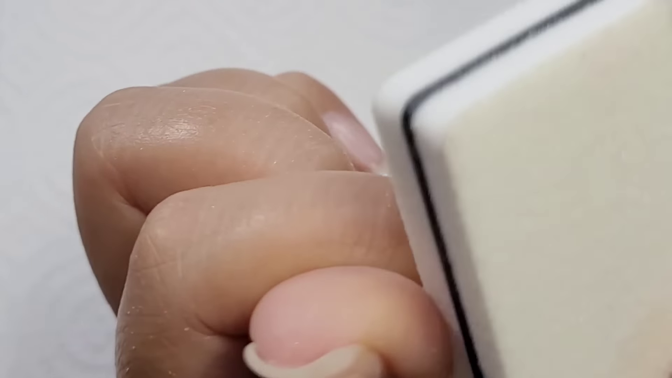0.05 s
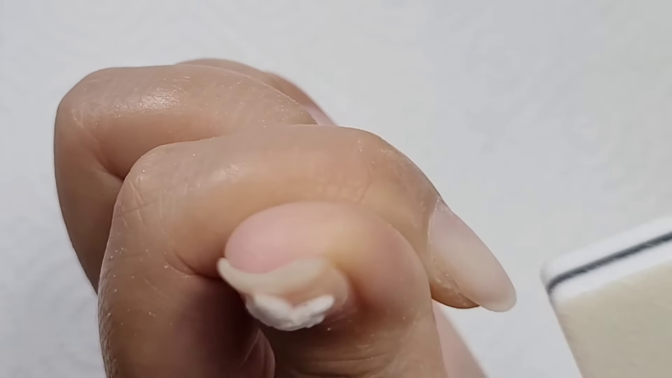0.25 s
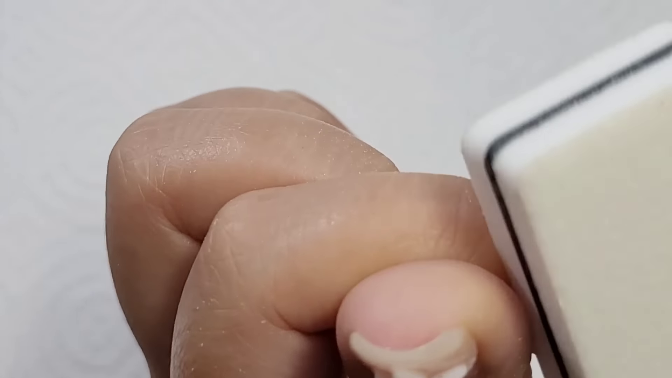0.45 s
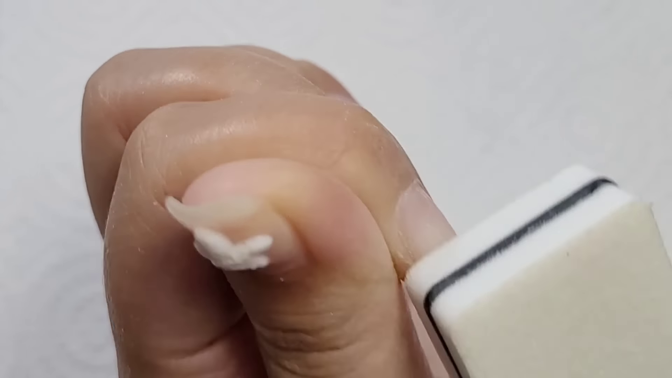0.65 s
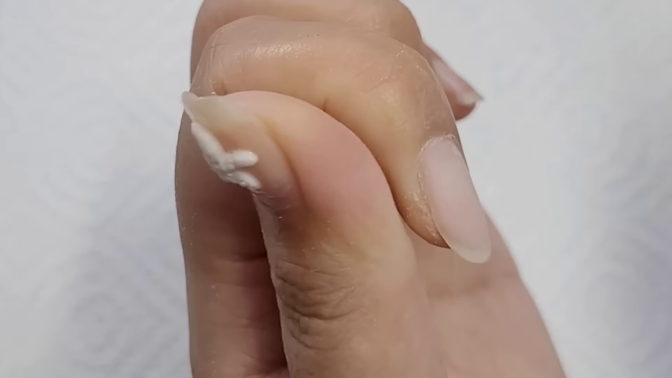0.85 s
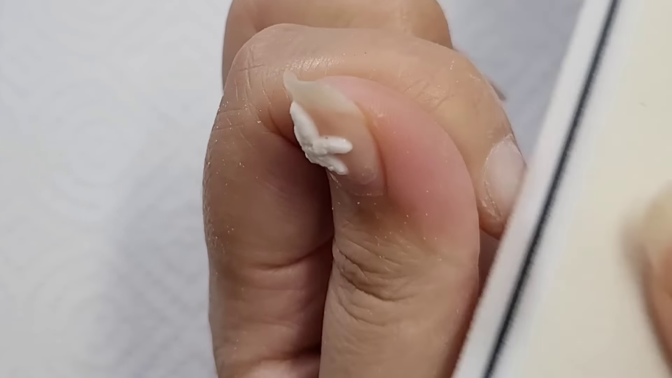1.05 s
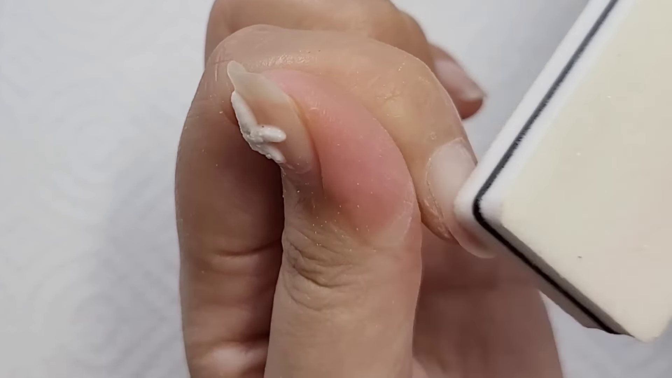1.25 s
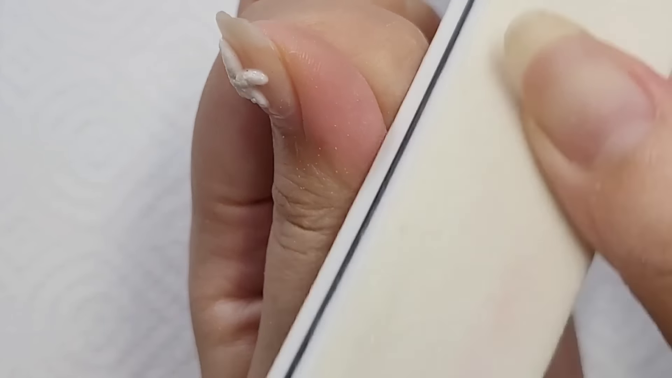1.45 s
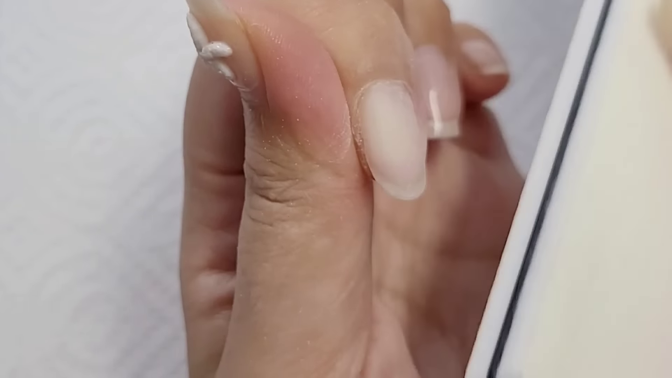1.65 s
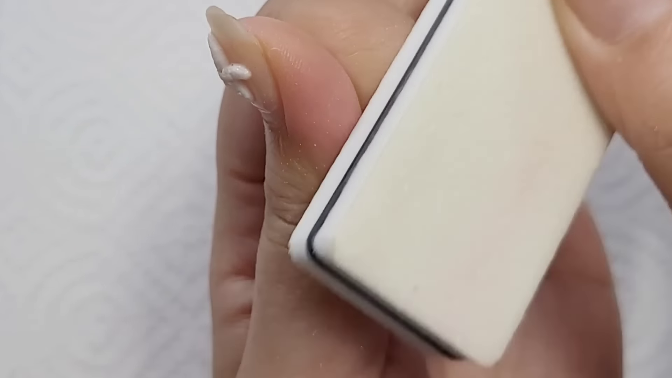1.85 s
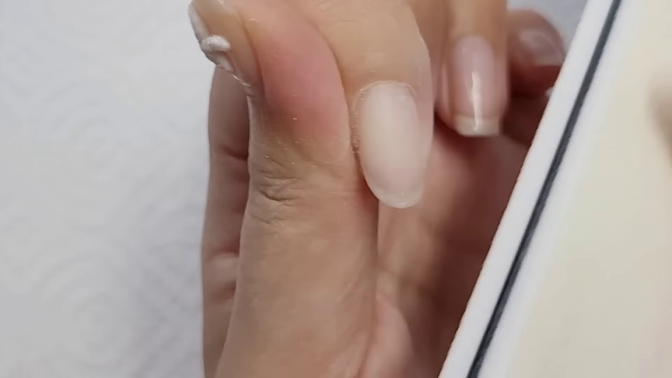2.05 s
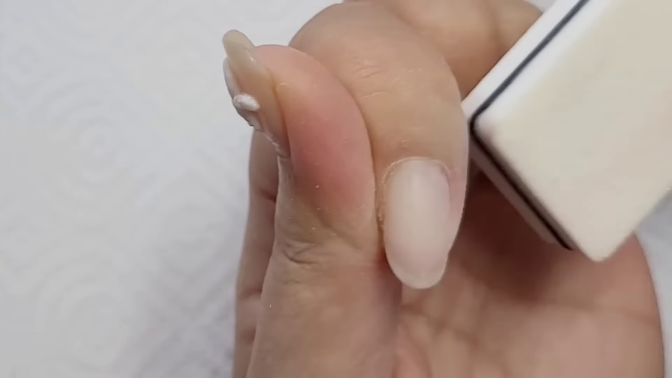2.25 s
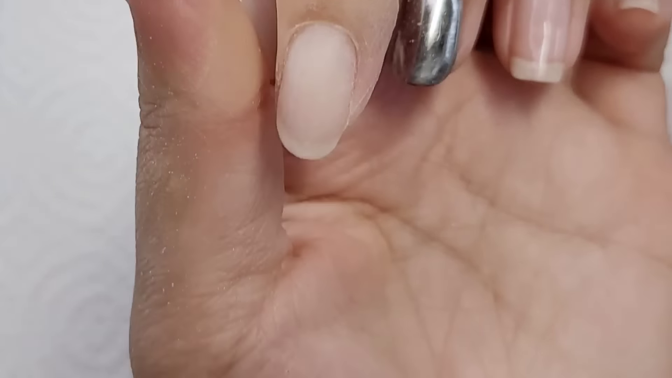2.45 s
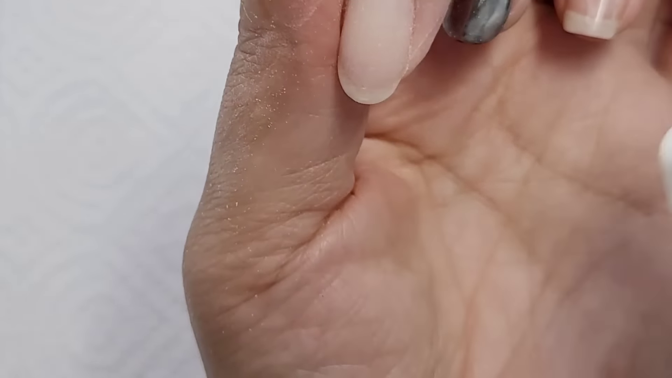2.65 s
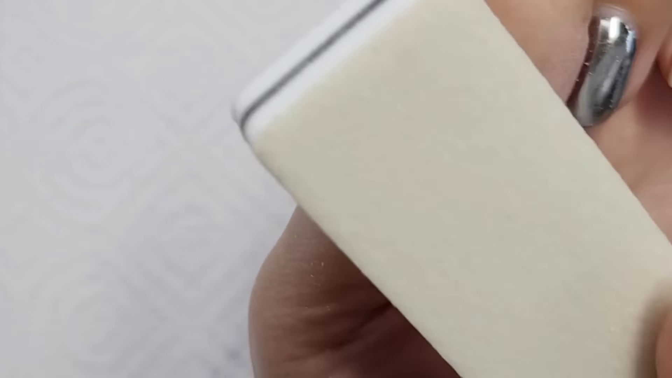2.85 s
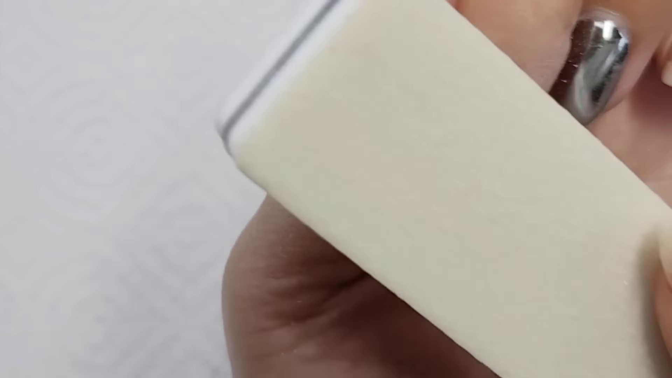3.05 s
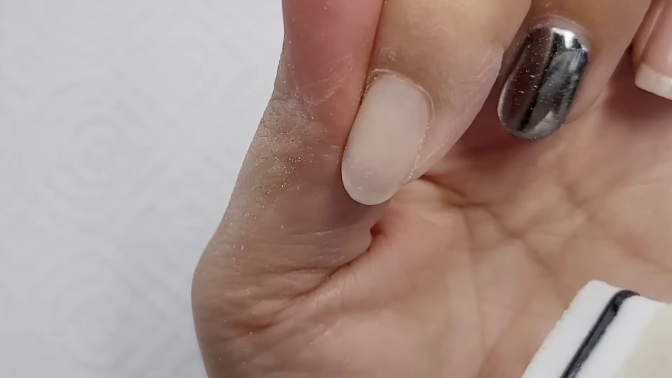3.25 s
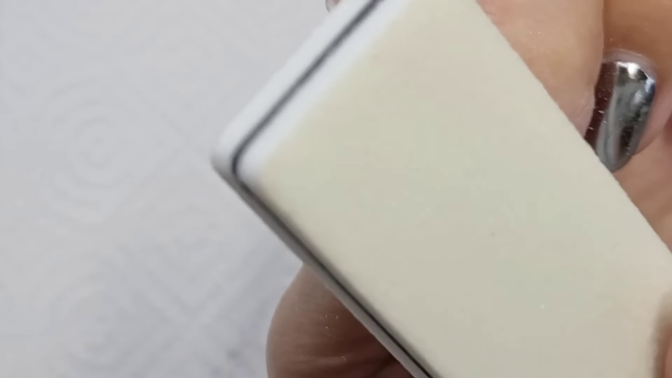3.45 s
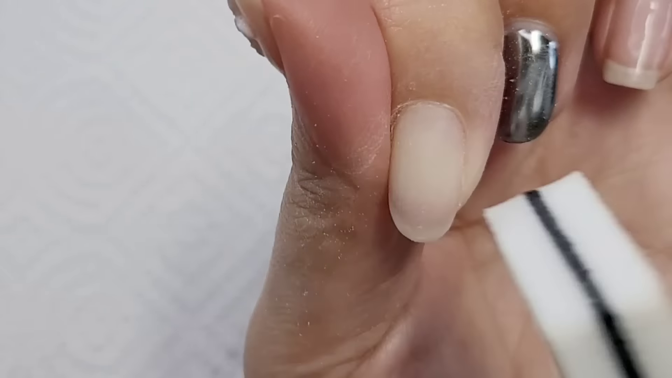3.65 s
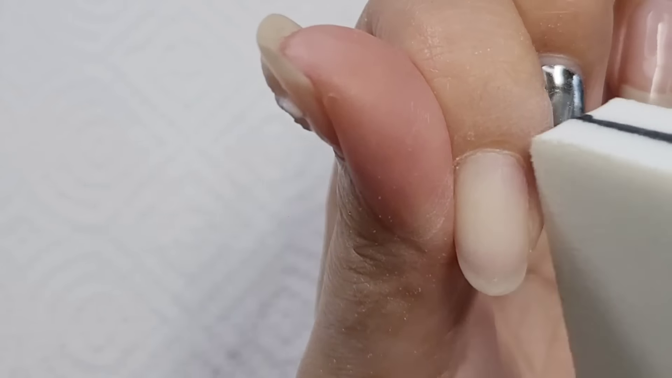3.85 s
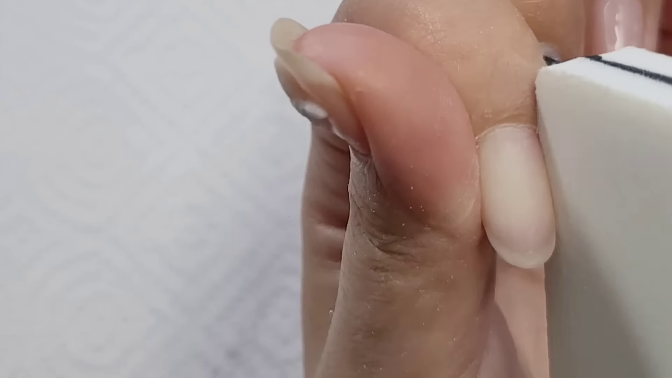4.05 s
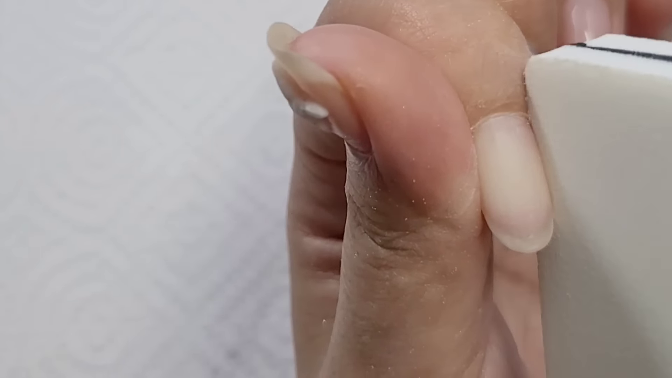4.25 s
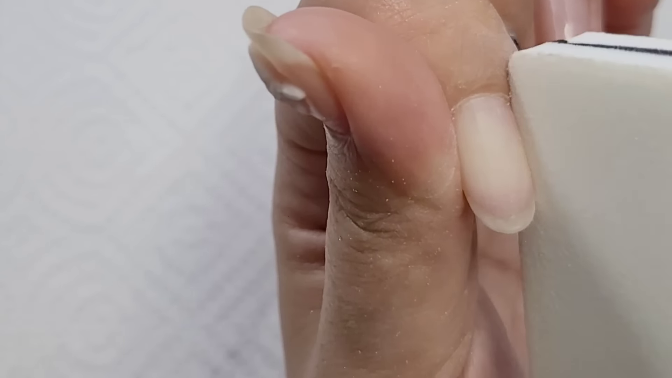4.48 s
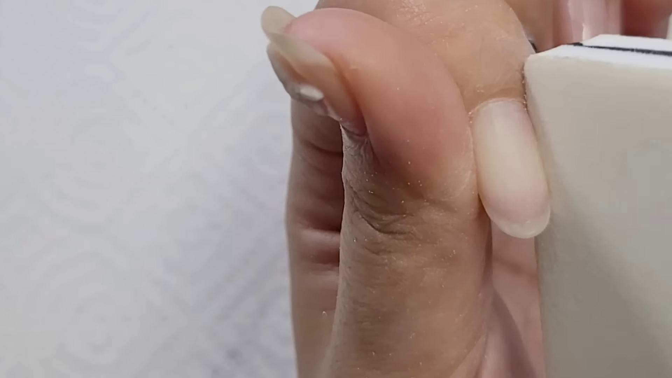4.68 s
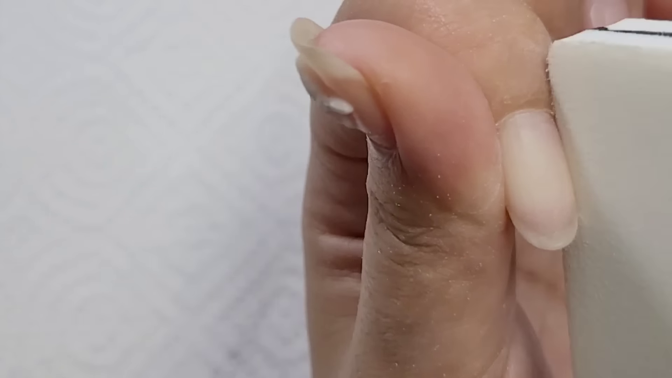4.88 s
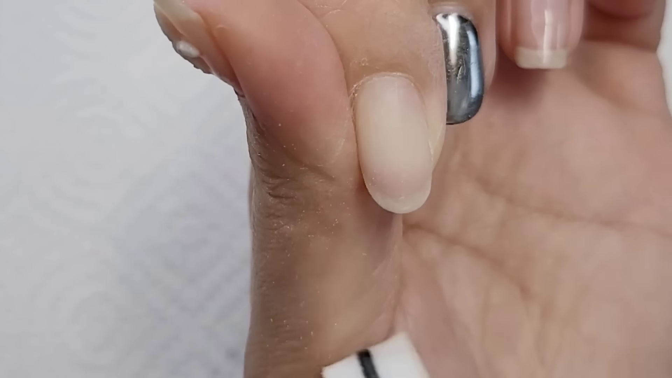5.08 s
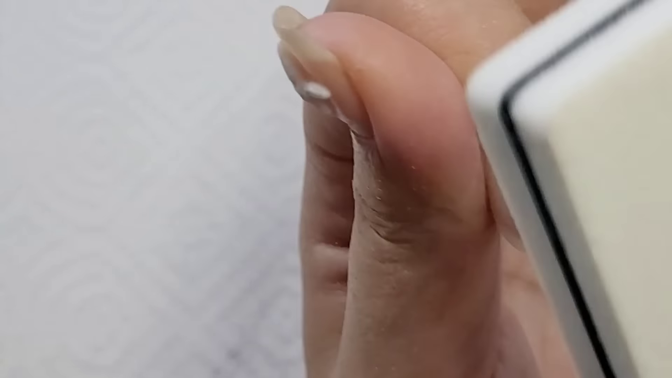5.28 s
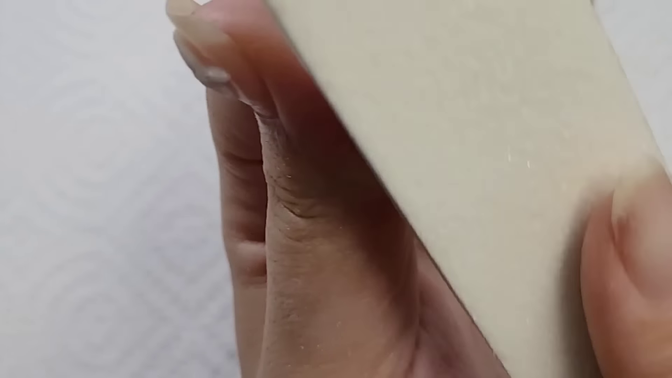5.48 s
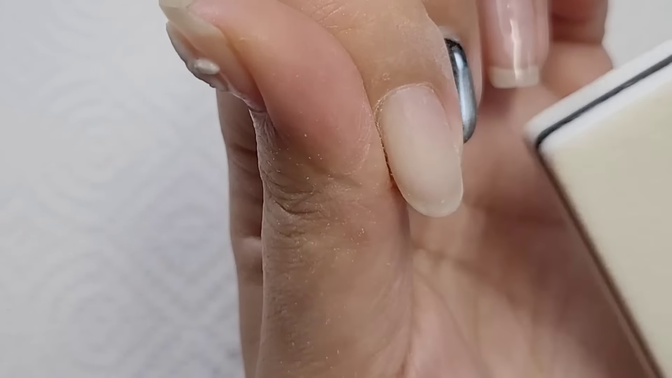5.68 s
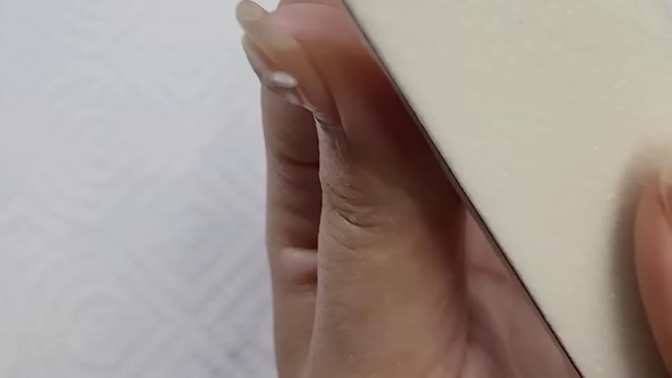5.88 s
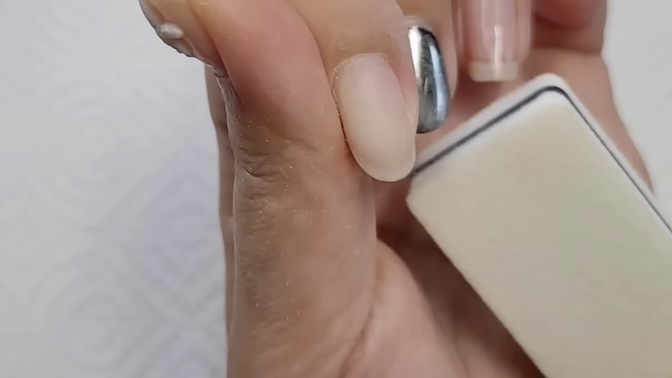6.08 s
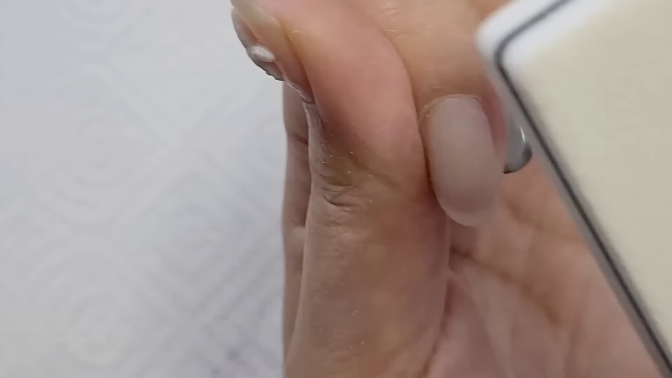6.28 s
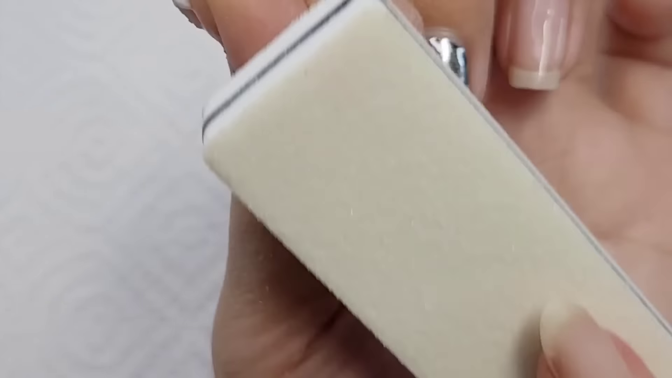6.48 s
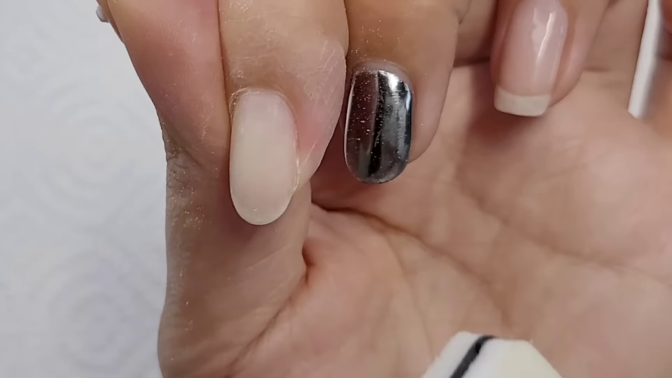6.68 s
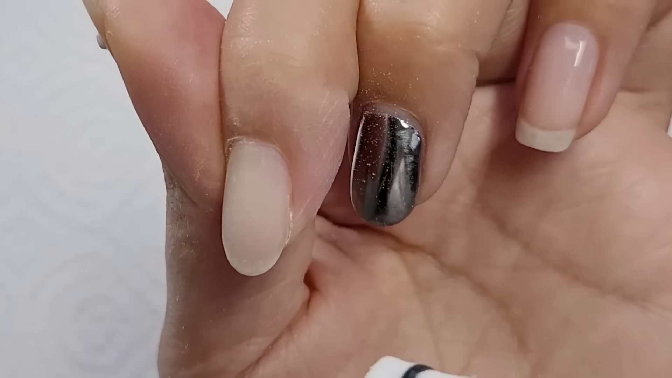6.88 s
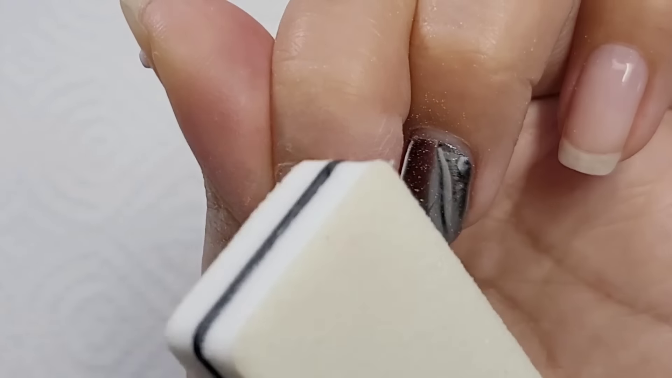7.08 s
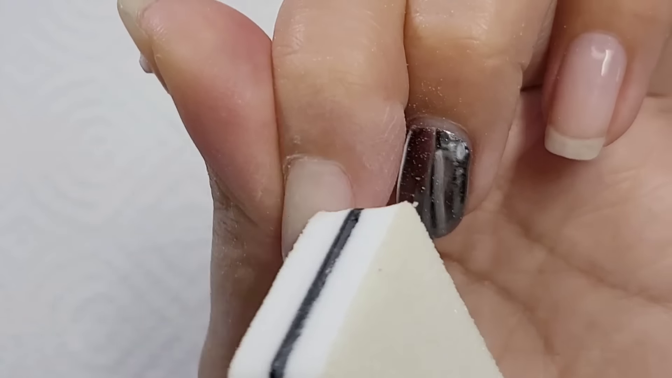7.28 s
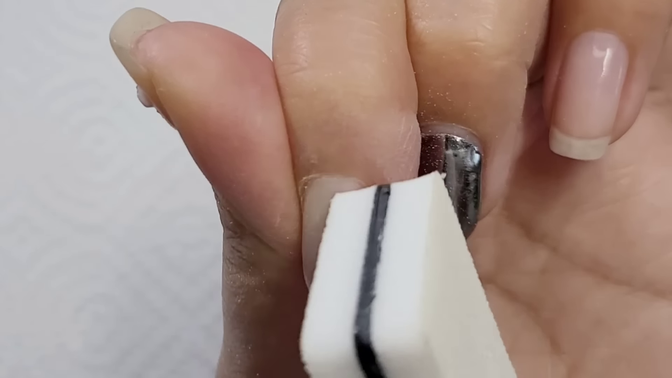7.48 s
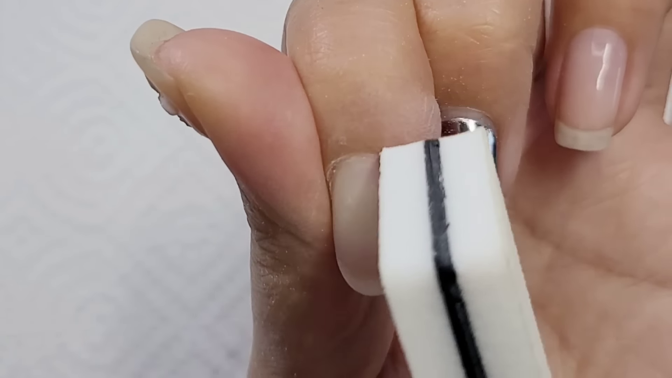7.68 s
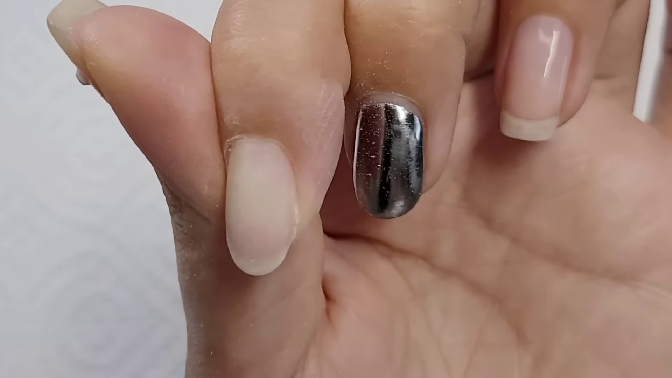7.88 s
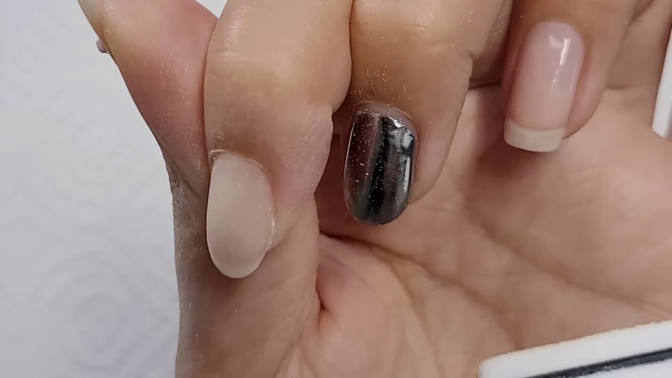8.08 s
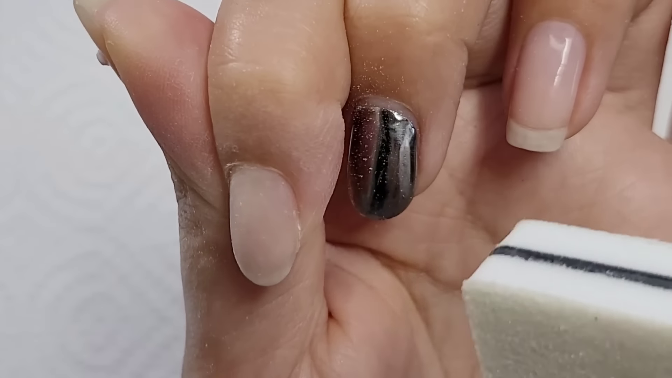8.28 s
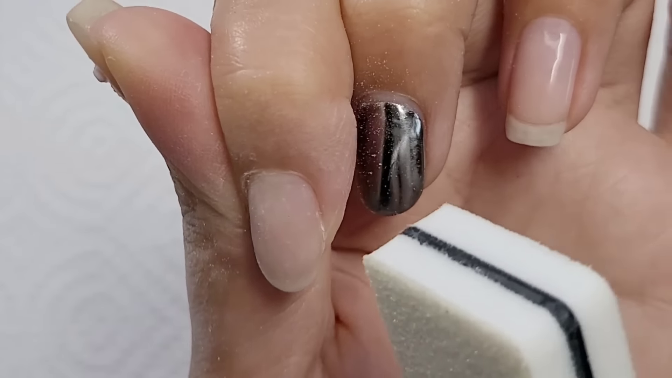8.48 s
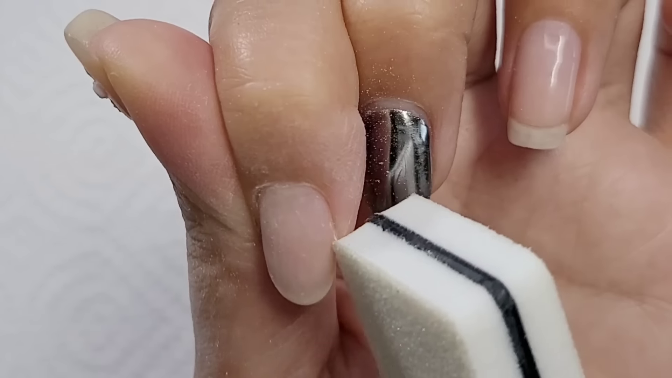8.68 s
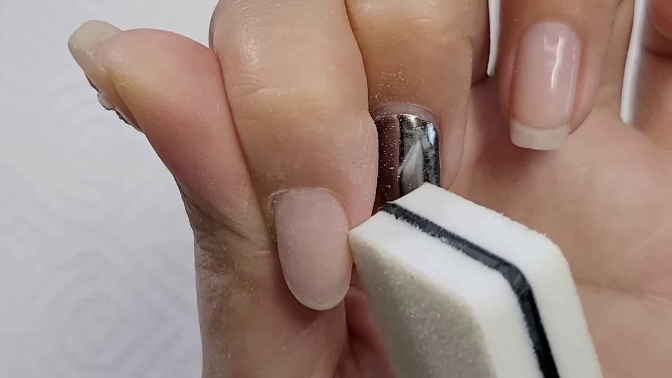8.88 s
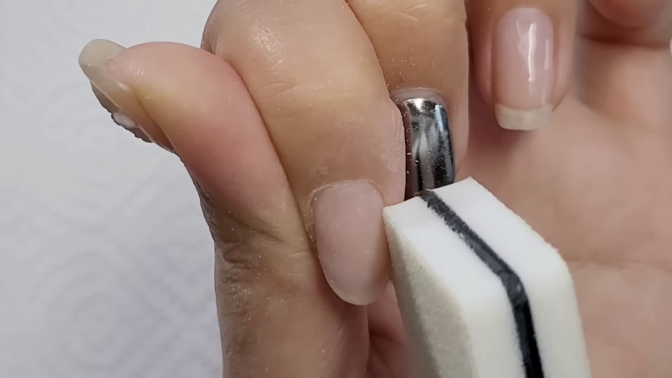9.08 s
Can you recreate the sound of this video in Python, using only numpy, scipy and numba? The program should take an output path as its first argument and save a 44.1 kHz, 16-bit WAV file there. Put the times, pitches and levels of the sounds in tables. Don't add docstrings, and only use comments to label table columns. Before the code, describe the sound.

Very close stereo pickup of a nail being buffed with a foam block in a small, quiet furnished room. Separate hissy, gritty pulls, some ending in a sharp knock as the edge snaps off the tip, give way to quick, quieter side flicks. Long pulls return, then short flicks and light drags, ending in near silence over faint ventilation.

```python
import sys
import numpy as np
from scipy import signal
from scipy.fft import rfft, irfft, next_fast_len
from scipy.io import wavfile
from scipy.ndimage import uniform_filter1d
from numba import njit

SR = 44100
rng = np.random.default_rng(int(sys.argv[2]) if len(sys.argv) > 2 else 0)


def wav_out(sig):
    wavfile.write(sys.argv[1], SR, np.round(np.clip(np.atleast_2d(sig).T, -1, 1) * 32767).astype(np.int16))


def ratio_of_db(decibels):
    return 10 ** (np.asarray(decibels, float) / 20)


N = 402633
M = next_fast_len(N)
HZ = np.fft.rfftfreq(M, 1 / SR) + 1
T = np.arange(N) / SR

# [t/s, finger cupping 0-1, free edge ring/dB, face turned to microphone/dB, left minus right/dB]
HOLD = [(.05, 0.77, 1, -5.5, 0), (.28, 0, 2, .3, -.5), (.579, 0.83, -5.5, 2.5, 0.5),
        (.781, 0, -0.3, 1, 0.8), (1.02, 0.72, 2.5, 4.5, -1.1), (1.33, 0.16, 13.5, .6, 1.1),
        (2.2, 0.2, 5, -1, 2), (2.72, 0.7, 6, -2.5, -0.5), (3.03, 0.76, -2.5, 3, 2.5),
        (3.65, 0.54, -3, -2, 1.6), (4.3, 0.96, 13, -2, 1), (4.95, 0.9, 13.5, 1, .6),
        (5.14, 0.71, -4.5, -0.8, 1.2), (5.7, 0.37, 5.5, -1.2, 1.5), (6.65, 0.65, 3, -2, 0.8),
        (7.22, 0.81, -20, -0.5, 3), (7.88, 0.88, -12.5, 1.5, 2), (8.3, 0.3, -22.5, -3.5, 0.7)]
# [f/Hz, density/dB per Hz]
GRIT_COLOUR = [(530, -30), (900, -29.5), (1320, -28.5), (1850, -20), (2070, -25), (2660, -10.5), (4680, -7),
               (8660, -2.5), (10500, -8.5), (13200, -5.5), (16000, -9)]
# [f/Hz, width/Hz, level/dB]
FREE_EDGE = [(7800, 170, -0.5), (8620, 790, -2)]

# [contact t/s, lift t/s, level at contact/dB, level at lift/dB, nail plate share/dB]
SWEEPS = [(.533, .624, -46.5, -48, -7), (.985, 1.01, -54, -50, -12.5), (1.236, 1.404, -49.5, -48.5, -12),
          (1.536, 1.714, -54, -47, -13.5), (1.91, 2.088, -54, -43, -12.5), (2.278, 2.395, -51, -42.5, -9.5),
          (2.966, 3.078, -47.5, -45.5, -9), (3.512, 3.578, -48.5, -48, -12),
          (3.675, 3.785, -46, -47.5, -13.5), (5.578, 5.778, -49, -44, -9),
          (6.563, 6.71, -47.5, -40.5, -10.5)]
SNAPS = [
    (.165, .338, -50, -39.5, -9.5),
    (.692, .824, -49.5, -39, -11),
    (2.696, 2.762, -54.5, -45.5, -9),
    (3.16, 3.281, -44, -44, -9),
    (5.1, 5.164, -49, -43.5, -8),
    (6.071, 6.226, -49, -39, -9),
    (7.845, 7.902, -56, -37.5, -9),
]
FLICKS = [(4.252, 4.288, -62.5, -56, -2), (4.368, 4.4, -57.5, -61.5, -4.5), (4.48, 4.504, -54, -56, -5.5),
          (4.576, 4.596, -58.5, -56, -6), (4.682, 4.706, -57, -58.5, -5), (4.78, 4.796, -58.5, -53.5, -5),
          (4.875, 4.912, -56.5, -50.5, -7), (4.98, 5.033, -53.5, -58, -5.5),
          (7.177, 7.255, -58, -49.5, -9.5), (7.373, 7.422, -52, -46.5, -8.5),
          (7.491, 7.526, -48, -48, -7.5), (7.616, 7.658, -53.5, -54, -6.5), (7.741, 7.752, -53.5, -55, -11),
          (1.285, 1.33, -48.5, -52, -10), (3.185, 3.215, -45, -46.5, -10), (6.2, 6.22, -40.5, -39.5, -19.5),
          (6.68, 6.704, -41, -40.5, -21)]
DRAGS = [(0.002, .085, -69.5, -57.5, -2.5), (.86, .93, -68, -63, -3.5), (1.015, 1.085, -48, -59.5, -8),
         (1.105, 1.19, -61, -60, -8), (2.425, 2.476, -50, -56.5, -8), (2.501, 2.566, -50, -60.5, -15.5),
         (2.594, 2.666, -54.5, -61.5, -10.5), (2.836, 2.87, -56.5, -68, -9), (2.93, 2.955, -64, -60, -3.5),
         (3.445, 3.482, -70, -56, -4.5), (4.032, 4.11, -63, -73, -9.5), (5.176, 5.235, -60, -59.5, -7),
         (5.524, 5.555, -57, -88, 6), (6.033, 6.06, -68, -63, -4), (6.244, 6.31, -41.5, -60, -10),
         (6.497, 6.535, -51, -70, -3), (6.725, 6.82, -42.5, -70, -7.5), (7.916, 7.98, -56, -53.5, -13.5),
         (8.014, 8.08, -54, -64.5, -7.5), (8.108, 8.15, -52.5, -52, -9), (8.165, 8.27, -55, -61.5, -7),
         (8.28, 8.337, -60.5, -55.5, -15), (8.403, 8.46, -51, -56.5, -17.5), (8.578, 8.648, -71, -72, -7)]
# [t/s, level/dB, nail plate share/dB]
CATCHES = [(.103, -45.5, -11), (.951, -50, -7.5), (1.146, -59, -12), (1.212, -42, -20), (1.52, -45.5, -18),
           (2.263, -43, -15.5), (2.673, -58.5, -10), (3.31, -41.5, -13.5), (3.498, -42, -23),
           (5.163, -41.5, -9), (5.255, -49, -18), (7.9, -38.5, -6.5), (7.997, -41.5, -12), (.973, -58, -10),
           (5.285, -60, -3), (8.048, -57.5, -7), (8.454, -55.5, -11), (8.52, -65.5, -15),
           (4.178, -65.5, -5)]
# [t/s, hush just before/dB]
LANDINGS = [(.099, -3.5), (.533, -21), (1.207, -2.5), (1.517, -17.5), (1.904, -5), (2.261, -4), (2.962, -7),
            (3.495, -8.5), (4.977, -7.5), (5.523, -13.5), (6.031, -14), (6.068, -6), (6.492, -14),
            (7.175, -14), (7.488, -12)]

# [t/s, click level/dB, click f/Hz, thud level/dB, crack level/dB]
KNOCKS = [(0.333, -40, 1040, -52.5, -36), (0.553, -51.5, 398, -69, -46), (0.823, -37.5, 1040, -51, -30.5),
          (2.258, -53.5, 417, -59, -49), (2.419, -30.5, 424, -53, -44), (2.431, -55, 398, -58, -44),
          (2.437, -43, 406, -68, -50), (2.961, -56.5, 397, -59.5, -45.5), (5.162, -44, 1900, -53.5, -27),
          (5.524, -53.5, 436, -60, -49), (5.777, -40.5, 980, -63, -35), (6.035, -52, 482, -51, -58),
          (6.221, -37, 970, -67.5, -31), (6.49, -60, 533, -62, -47), (6.706, -37, 950, -55, -26),
          (6.711, -40, 730, -70.5, -55), (7.9, -42.5, 1910, -52.5, -32.5), (7.992, -57, 1230, -68, -41)]
# [t/s, level/dB]
LOOSE_GRIT = [
    (0.1042, -49),
    (1.2095, -35),
    (1.5192, -42.5),
    (3.4973, -52),
    (4.0317, -57),
    (4.62, -69.5),
    (8.504, -54),
    (8.5764, -50),
    (8.628, -67),
]
# [start t/s, end t/s, f/Hz, width/Hz, level/dB]
BRUSHES = [
    (8.533, 8.686, 5500, 1310, -69),
    (9.078, 9.14, 7960, 3520, -79),
]

# [f/Hz, density/dB per Hz]
AIR_COLOUR = [(15, -33), (30, -0.5), (48, -4.5), (100, -3.5), (200, -10), (400, -9), (700, -11), (900, -16),
              (1100, -23), (2500, -26), (4500, -31.5), (7000, -35.5), (9000, -31), (16000, -38)]
# [f/Hz, likeness -1 to 1]
AIR_ALIKE = [(60, 0.96), (130, 0.72), (290, 0.51), (640, -0.36), (1400, -0.24), (3100, -0.14),
             (15000, -0.17)]
# [f/Hz, level/dB]
WHINE = [(4927, -108), (9853, -101), (14780, -105)]

# (attack dB/s, release dB/s, swell dB, dust onset dB)
SWEEP, SNAP = (1002, 446.5, 2, -25.5), (1001, 851.5, 1.5, -20)
FLICK, DRAG, CATCH = (813, 700, 1, -34), (1100.5, 746, 0.7, -25), (1900.5, 619, -1.3, -27.5)
DUST_DB_PER_S, FADE_SHARE = 192, 0.27
REST_DB, QUIETER_S, QUIETER_DB = -88.5, 6.7, -16
HOVER_S, DROP_S = 0.038, 0.0033
HOLLOW, GROOVE, SIDE_S = (2620, 480), (2980, 960), (4.2, 5.07)
# (base dB, dB per cupping, dB per dB of edge ring)
HOLLOW_DB, SIZZLE_DB, WEIGHT_DB = (-31, 30), (0.5, -5, 0.16), (-0.5, 0.5, 0.29)
PALM_MS, PALM_ECHO = 0.4505, .05
THUD_LEFT_DB, TIP_THUD_LEFT_DB = 4, -7.5


def rubbing(scatter_db=1.8, weight_hz=2120, split_hz=4600, top_hz=10500, own=.8, echo=.45):
    rub_db, plate_db = pressure()
    hold_s, *hold = np.transpose(HOLD)
    cup, edge_db, face_db, pan_db = (np.interp(T, hold_s, column) for column in hold)
    hollow_db = HOLLOW_DB[0] + HOLLOW_DB[1] * cup
    top_db, weight_db = (base + a * cup + b * edge_db for base, a, b in (SIZZLE_DB, WEIGHT_DB))

    body = ratio_of_db(on_hz(GRIT_COLOUR))
    deep = 1 / (1 + (HZ / weight_hz) ** 20)
    low = 1 / (1 + (HZ / split_hz) ** 8)
    high = 1 / (1 + (top_hz / HZ) ** 12)
    hollow = cavity(*HOLLOW, low - deep)
    groove = cavity(*GROOVE, low - deep * .6)
    beside = (T > SIDE_S[0]) & (T < SIDE_S[1])
    edge = sum(ratio_of_db(db) * peak(hz, width_hz) for hz, width_hz, db in FREE_EDGE)

    chatter = ratio_of_db(1.19 * walk(120) + 0.91 * walk(35))
    scatter = ratio_of_db(scatter_db * np.minimum(rng.exponential(size=(3, N)), 5))
    grit = rng.standard_normal((3, N)) * scatter * chatter
    out = []
    for ear, side in enumerate((1, -1)):
        direct = delayed(grit[2], .3 - side * (0.046 + 0.031 * walk(4))) + own * grit[ear]
        hand_ms = np.abs(PALM_MS + .15 * (1 - cup ** 4) * walk(4))
        x = direct + (echo + PALM_ECHO * cup ** 4) * delayed(direct, hand_ms)
        x = x + .42 * delayed(direct, 1.3 + .3 * walk(7))

        cavities = np.where(beside, unit(colour(x, groove)), unit(colour(x, hollow)))
        plate = unit(colour(x, body * (low - deep))) + ratio_of_db(hollow_db) * cavities
        weight = ratio_of_db(weight_db - 15.5) * unit(colour(x, body * deep))
        plate = ratio_of_db(plate_db) * (plate + weight)
        sizzle = ratio_of_db(top_db + face_db - 3.04 + 0.99 * side) * unit(colour(x, body * high))
        mid = ratio_of_db(-4.5) * unit(colour(x, body * (1 - low) * (1 - high)))
        rings = ratio_of_db(edge_db - 12 + 0.68 * (rub_db + 43)) * unit(colour(direct, edge))
        out.append(ratio_of_db(rub_db + 3.0 + side * pan_db / 2) * (plate + mid + rings + sizzle))
    return np.array(out)


def cavity(hz, width_hz, band):
    return peak(hz, width_hz) * band * HZ / hz / 1j


def pressure():
    t = T[::32]
    catches = [(s, s, db, db, plate_db) for s, db, plate_db in CATCHES]
    kinds = (SWEEPS, SWEEP), (SNAPS, SNAP), (FLICKS, FLICK), (DRAGS, DRAG), (catches, CATCH)
    rest = ratio_of_db(2 * (REST_DB + QUIETER_DB * (t > QUIETER_S)))
    rub, plate = sum(touch(t, *kind) for kind in kinds) + rest
    hush_db = 0
    for s, db in LANDINGS:
        ahead_s = s - t
        landing = np.clip(ahead_s / DROP_S, 0, 1)
        hover = np.clip(2 - 2 * ahead_s / HOVER_S, 0, 1)
        hush_db = hush_db + db * landing * hover
    return np.interp(T, t, 10 * np.log10(rub) + hush_db), np.interp(T, t, 10 * np.log10(plate / rub))


def touch(t, rows, shape):
    start, end, start_db, end_db, plate_db = np.transpose(rows)[..., None]
    attack, release, swell_db, dust_db = shape
    u = np.clip((t - start) / np.maximum(end - start, 1e-4), 0, 1)
    early, late = np.maximum(start - t, 0), np.maximum(t - end, 0)
    fade_db = attack * early + np.minimum(release * late, DUST_DB_PER_S * late - dust_db)
    db = start_db + (end_db - start_db) * u + swell_db * 4 * u * (1 - u) - fade_db
    share_db = np.clip(plate_db + np.minimum(FADE_SHARE * fade_db, 5.5), -24, 0)
    return np.array([np.sum(ratio_of_db(2 * db), axis=0), np.sum(ratio_of_db(2 * (db + share_db)), axis=0)])


def knocks(thud_hz=105, thud_lag_s=0.003, crack_s=0.0015):
    out, t = np.zeros((2, N)), np.arange(3000) / SR
    for s, click_db, hz, thud_db, crack_db in KNOCKS:
        noise = rng.standard_normal((3, len(t)))
        click = ring(t, hz, 0.83 / hz) + 0.2 * ring(t, 3.4 * hz, 0.0023)
        if hz > 800:
            click = click + 0.3 * ring(t, 3800, 0.00045) + 1.3 * ring(t, 2097, .00017)
        click = ratio_of_db(click_db + 1.5) * click
        rattle = signal.lfilter([.08, -.07], [1, -1.75, .8], noise[:2])
        rattle = rattle * 0.65 * ratio_of_db(click_db + 8) * np.exp(-t / 0.009)

        lag_s = thud_lag_s + np.array([[.0012], [0]]) * (crack_db > thud_db + 20)
        pan_db = TIP_THUD_LEFT_DB if hz > 1150 else THUD_LEFT_DB
        thud = ratio_of_db(thud_db + 11) * ring(t - lag_s, thud_hz, 0.0063)
        thud = thud * ratio_of_db(np.array([[pan_db], [-pan_db]]) / 2)

        crack = noise - np.roll(noise, 3, axis=1)
        crack = ratio_of_db(crack_db + 3.5) * crack * t / crack_s * np.exp(-t / crack_s)
        crack = 1.03 * crack[:2] + 0.63 * crack[2]
        i = int((s + 0.0015) * SR)
        out[:, i:i + len(t)] += click + rattle + crack + thud
    return out


def loose_grit():
    out, t = np.zeros((2, N)), np.arange(3000) / SR
    for s, db in LOOSE_GRIT:
        i = int(s * SR)
        grain = np.diff(rng.standard_normal((2, len(t) + 2)), 2)
        out[:, i:i + len(t)] += ratio_of_db(db - 9.5) * grain * np.exp(-t / 0.00088)
    return out


def pluck(s=3.0785, hz=1080, db=-43.5):
    onset = np.clip((T - s) / 0.002, 0, 1)
    return ratio_of_db(db + 4) * onset * ring(T - s, hz, 0.0021) * np.ones((2, 1))


def skin_brushes():
    out = np.zeros((2, N))
    for start, end, hz, width_hz, db in BRUSHES:
        swell = np.sin(np.pi * np.clip((T - start) / (end - start), 0, 1)) ** 0.77
        hiss = unit(colour(rng.standard_normal((2, N)), peak(hz, width_hz) ** 2))
        out = out + ratio_of_db(db) * swell * hiss
    return out


def room(x, t60_s=0.46, wet_db=-22):
    t = T[:SR // 2]
    tail = rng.standard_normal((2, len(t))) * np.exp(-np.log(1000) * t / t60_s) * (t > .004)
    tail = tail / np.sqrt(np.sum(tail ** 2, axis=1, keepdims=True))
    return x + ratio_of_db(wet_db) * signal.fftconvolve(x, tail, axes=1)[:, :N]


def air(level_db=-67):
    alike = np.clip(on_hz(AIR_ALIKE), -.95, .95)
    density = ratio_of_db(on_hz(AIR_COLOUR))
    mid, side = (colour(rng.standard_normal(N), density * np.sqrt(1 + k * alike)) for k in (1, -1))
    settle = np.clip((T - 8.65) / 0.11, 0, 1)
    both = unit(np.array([mid + side, mid - side])) * ratio_of_db(level_db + 0.5 + .5 * walk(3.12) - 1.0 * settle)
    both = both - 0.32 * settle * colour(both, 1 / (1 + (3500 / HZ) ** 4))
    return both + sum(ratio_of_db(db + 7.0) * np.sin(2 * np.pi * hz * T) for hz, db in WHINE)


def unit(x):
    return x / np.sqrt(np.mean(x ** 2))


def on_hz(table):
    hz, value = np.transpose(table)
    return np.interp(np.log(HZ), np.log(hz), value)


def colour(x, gain):
    return irfft(rfft(x, M) * gain, M)[..., :N]


def peak(hz, width_hz):
    return 1 / (1 + 1j * (HZ ** 2 - hz ** 2) / (HZ * width_hz))


def ring(t, hz, decay_s):
    t = np.maximum(t, 0)
    return np.sin(2 * np.pi * hz * t) * np.exp(-t / decay_s)


def walk(rate):
    k = int(SR / rate)
    held = np.repeat(rng.standard_normal(N // k + 1), k)
    return 1.327 * uniform_filter1d(uniform_filter1d(held, k), k)[:N]


@njit
def delayed(x, ms):
    y = np.zeros(len(x))
    for i in range(400, len(x) - 2):
        p = i - min(max(ms[i], 0.), 8.) * SR / 1000
        k = int(p)
        f = p - k
        a, b, c, d = x[k - 1], x[k], x[k + 1], x[k + 2]
        y[i] = b + .5 * f * (c - a + f * (2 * a - 5 * b + 4 * c - d + f * (3 * (b - c) + d - a)))
    return y


def scene():
    hands = rubbing() + knocks() + loose_grit() + pluck() + skin_brushes()
    return room(hands) + air()


def band_limit(x):
    return signal.sosfilt(signal.butter(12, 15800, fs=SR, output="sos"), x)


def record(dry):
    mix = colour(dry, (HZ < 15860) / (1 + (34 / HZ) ** 4))
    return band_limit(mix)


dry = scene()
out = record(dry)
wav_out(out)
```